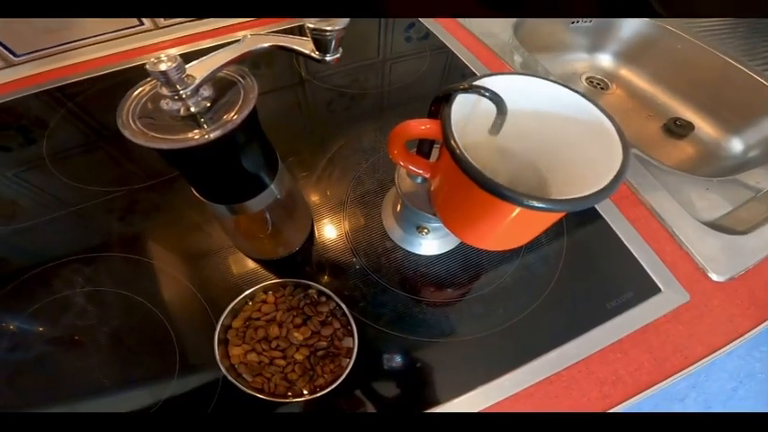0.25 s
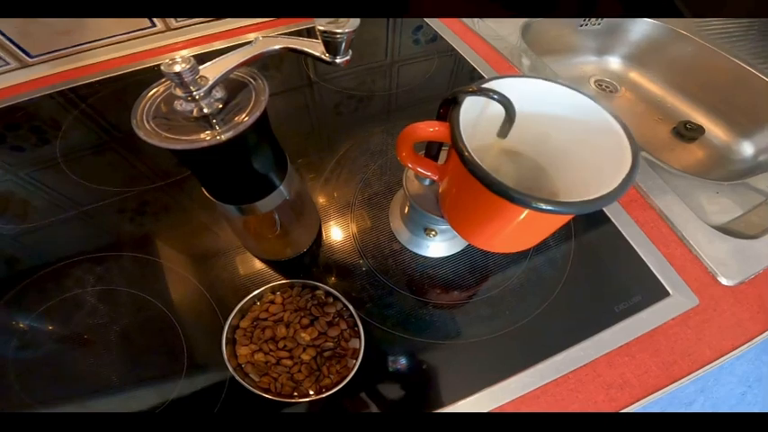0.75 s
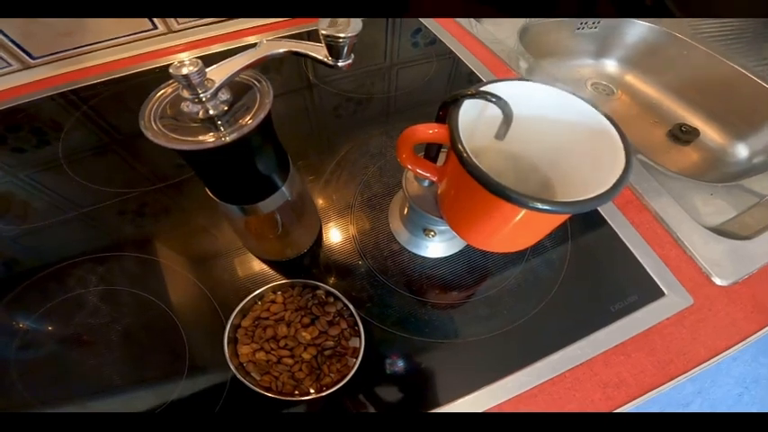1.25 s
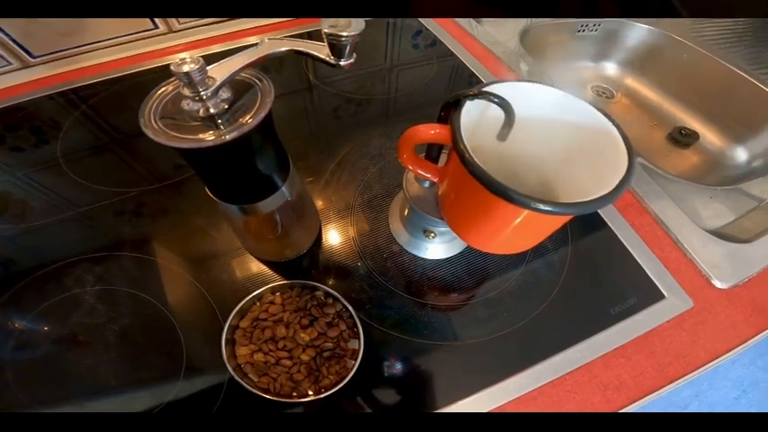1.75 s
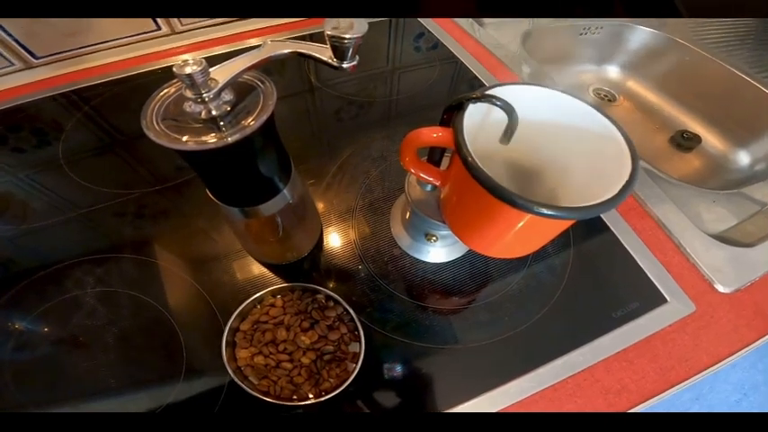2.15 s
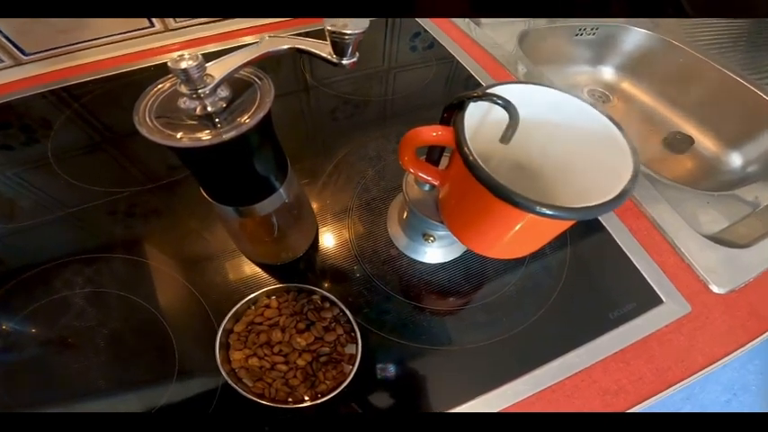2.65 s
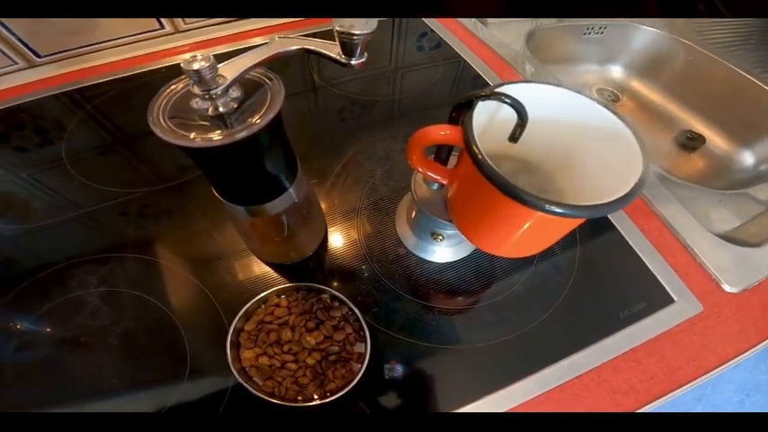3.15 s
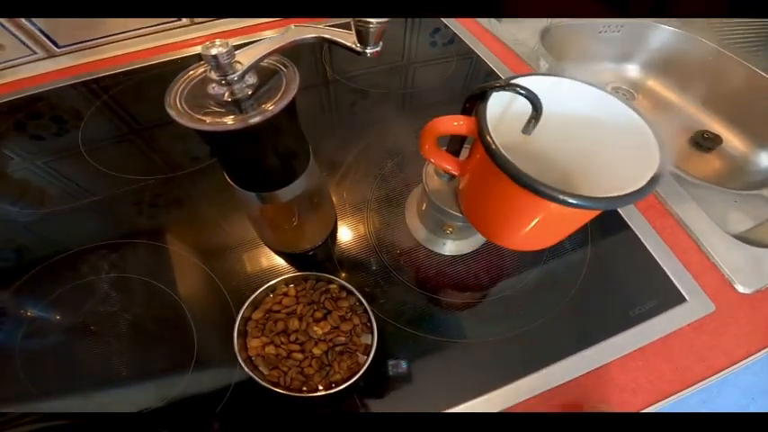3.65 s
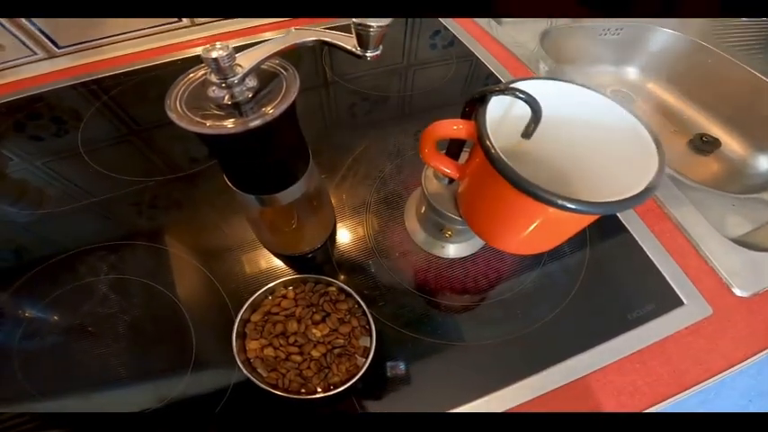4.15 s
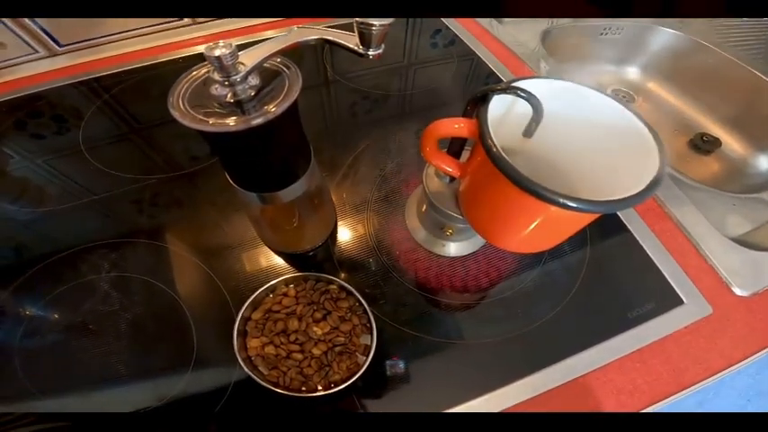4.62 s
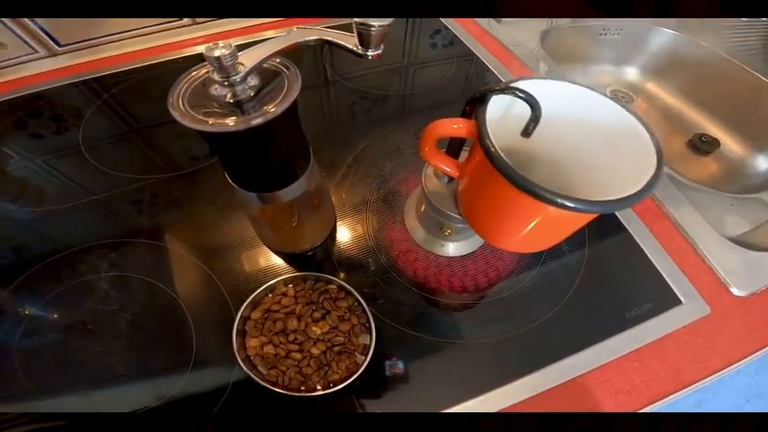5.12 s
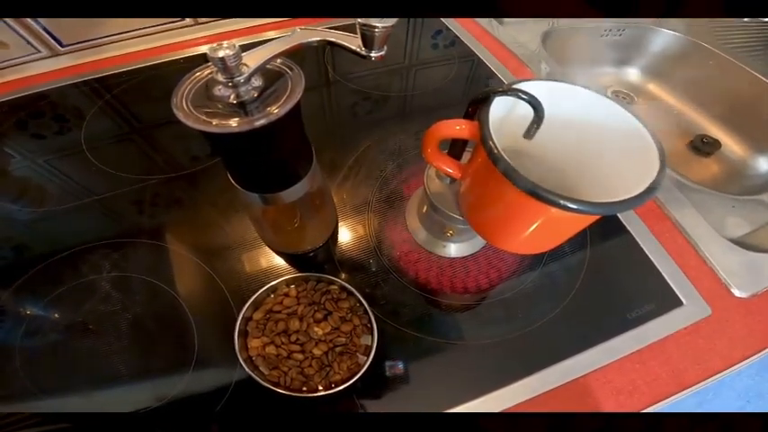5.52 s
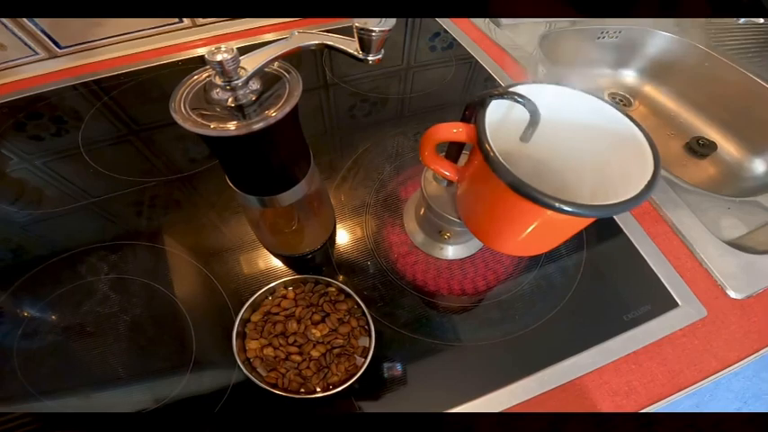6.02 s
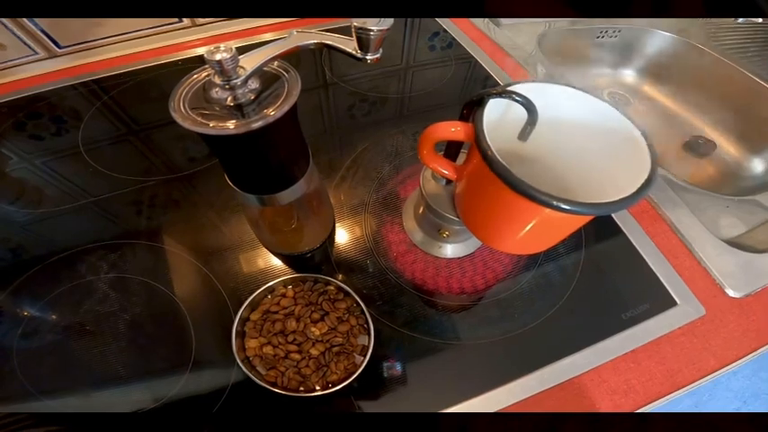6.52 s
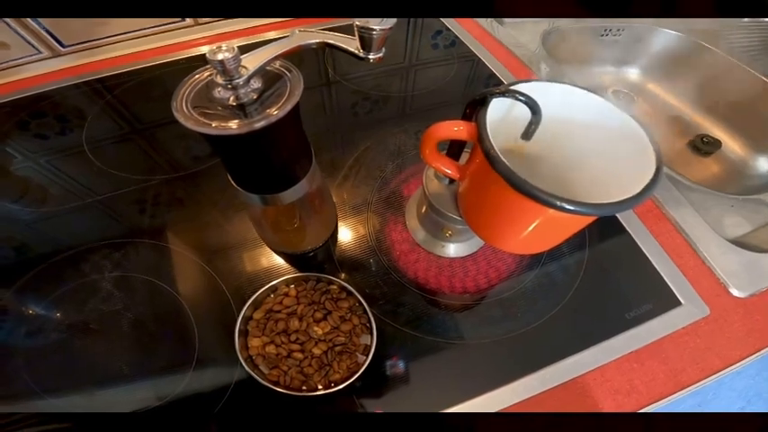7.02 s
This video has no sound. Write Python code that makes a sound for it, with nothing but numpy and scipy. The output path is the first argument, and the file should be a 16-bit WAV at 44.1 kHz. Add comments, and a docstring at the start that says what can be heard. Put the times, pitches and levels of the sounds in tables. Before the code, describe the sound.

Close up in a small kitchen, a stovetop coffee pot starts with single hollow pops over a faint low hob hum. Within a second and a half, steam spurts take over: throaty gurgling, chugging from the base, and wet spray ticking and ringing in an enamel mug. Midway a switch clicks and the hum ends, while the sputtering continues, drier and slightly higher.

```python
"""A stovetop coffee pot spits through its spout into an enamel mug, close by in a small kitchen.
At first the hob hums under single pops: each bursting slug rings the air in the spout (damped oscillation).
Spurts of steam soon take over, with a chugging boiler and fine spray (noise bursts) that rings the mug.
After two seconds steam leaks faintly for a moment (filtered noise); then a switch clicks and the hum stops.
The sputter goes on to the end, its small slugs ringing slightly higher, with duller and weaker spray, as
the spout empties; a steady kitchen background lies under it all."""
import sys
import numpy as np
from scipy import signal
from scipy.fft import rfft, irfft
from scipy.io import wavfile
from scipy.ndimage import uniform_filter1d

SR = 44100
rng = np.random.default_rng(int(sys.argv[2]) if len(sys.argv) > 2 else 0)


def to_wav(sig):
    """Store sig (one row per channel, or 1-D mono) as 16-bit WAV at the path in sys.argv[1].

    Samples outside -1..1 are clipped; the rate is SR.
    """
    pcm = np.clip(np.atleast_2d(sig), -1, 1) * 32767
    pcm = np.round(pcm).astype(np.int16)
    wavfile.write(sys.argv[1], SR, pcm.T)  # frames by channels


N = 321041  # length in samples


def undb(db):
    """Logarithmic level: decibels to amplitude gain."""
    return 10 ** (np.asarray(db) / 20)


def unit(x):
    """Normalisation to an rms value of 1."""
    return x / np.sqrt(np.mean(x ** 2))


def noise():
    """White noise: equal power at all frequencies."""
    return rng.standard_normal(N)


def curves(table):
    """Linear interpolation of each column of a (t/s, ..) table, sample by sample."""
    s, *columns = np.transpose(table)
    return [np.interp(np.arange(N) / SR, s, c) for c in columns]


def add(track, s, sound):
    """Superposition: mix a short sound into the track at time s."""
    i = min(max(int(s * SR), 0), N - 1)
    track[i:i + len(sound)] += sound[:N - i]


def convolve(x, response):
    """Linear filtering: convolution with an impulse response."""
    return signal.fftconvolve(x, response)[:N]


def colour(points, size=4096):
    """Minimum-phase filter: the causal impulse response with a given (f/Hz, level/dB) spectrum."""
    hz, db = np.transpose(points)
    f = np.maximum(np.arange(size // 2 + 1) * SR / size, 1)
    log_gain = np.log(undb(np.interp(np.log(f), np.log(hz), db)))
    # folding the cepstrum onto positive time makes the response causal
    cepstrum = irfft(log_gain)
    cepstrum[1:size // 2] *= 2
    cepstrum[size // 2 + 1:] = 0
    return irfft(np.exp(rfft(cepstrum)))


def resonate(x, modes):
    """Modal resonance: the sound plus the ringing of its (f/Hz, width/Hz, level/dB) modes."""
    out = x
    for hz, width, db in modes:
        out = out + undb(db) * signal.lfilter(*signal.iirpeak(hz, hz / width, SR), x)
    return out


def ring(hz, t60, attack, glide=0, hold=1):
    """Damped oscillation; its pitch slides by the share glide, and hold above 1 keeps the first cycles strong."""
    t = np.arange(int(t60 * SR) + 2) / SR
    shape = (1 - np.exp(-t / attack)) * np.exp(-np.log(1000) * (t / t60) ** hold)
    phase = 2 * np.pi * hz * t * (1 + glide * t / t60 / 2)
    return shape / shape.max() * np.sin(phase)


def burst(t60, size=512):
    """Impulsive noise: a decaying crack with peak 1."""
    x = rng.standard_normal(size) * np.exp(-np.log(1000) * np.arange(size) / SR / t60)
    return x / abs(x).max()


def swell(start, length, attack, release, sag_db=0):
    """Amplitude envelope: a rise, a hold that sags by sag_db, and an exponential release."""
    t = np.arange(int((length + 7 * release) * SR)) / SR
    held = np.minimum(t / attack, 1) * undb(-sag_db * np.minimum(t / length, 1))
    out = np.zeros(N)
    add(out, start, held * np.exp(-np.maximum(t - length, 0) / release))
    return out


def pot(flow, wet, chug_db, empty):
    """Superposition of the pot's sources, driven by one steam flow."""
    small, small_film = bubbling(empty)
    big, big_film = pops(POP_EVENTS + slugs(empty))
    air = big + flow * undb(-3) * small
    # the crack of a film rings the spout too
    struck = air + big_film
    base = boiler(air * undb(chug_db), flow * undb(chug_db), empty)
    tick, splash = drops(flow, empty)
    # films (-1 dB) and mist (-4 dB) follow the wetness of the flow
    droplets = big_film + splash + wet * (undb(-1) * small_film + undb(-4) * mist())
    return spout(struck, empty) + base + spray(droplets, tick, empty) + plinks() + spits()


FILM_T60 = .012  # decay of a bursting film's crack, s
# loud pops that stand out of the gurgle, before the spout colours them:
# columns: t/s, peak level/dB, ring f/Hz, level/dB of the bursting film
POP_EVENTS = [(.1368, -12.5, 1130, -30.5), (0.4282, -5.5, 1070, -21), (.6681, -24, 1070, -26),
              (0.7522, -2, 1030, -21.5), (0.7839, -9.5, 1004, -20), (0.8166, -11.5, 1010, -28),
              (0.8244, -15, 1000, -30), (0.8483, -6.5, 1075, -22.5), (.898, -19, 1050, -33),
              (1.0135, -15, 1008, -46), (1.0522, -20.5, 1020, -41), (1.0954, -15.5, 1025, -39),
              (1.2051, -17.5, 1040, -20.5), (1.2629, -18.5, 960, -30.5), (1.372, -10, 940, -19),
              (1.4293, -8, 780, -37), (1.5411, -12.5, 1005, -21), (1.605, -4.5, 890, -41),
              (1.719, -6, 900, -27), (1.9025, -5.5, 965, -22.5), (2.231, -12, 984, -22),
              (2.3732, -16, 950, -30), (2.5191, -12, 980, -24), (2.5997, -10.5, 900, -26),
              (2.702, -6.5, 1050, -21), (3.0083, -8, 1000, -17), (3.055, -10, 910, -23),
              (3.2277, -7, 930, -25.5), (3.426, -8.5, 950, -24), (3.4412, -13, 930, -24),
              (3.4964, -9, 988, -15), (3.9231, -4, 955, -21), (4.0818, -5.5, 960, -23),
              (4.164, -6.5, 960, -17), (4.2153, -12, 980, -20), (4.293, -13, 1020, -22.5),
              (4.44, -15.5, 925, -43), (4.6692, -7.5, 979, -28), (4.7282, -7.5, 930, -21),
              (4.9208, -15, 1020, -22), (4.9404, -13.5, 1005, -17), (5.1792, -10.5, 990, -22),
              (5.2247, -8.5, 920, -24), (5.268, -8, 1040, -26), (5.3982, -9.5, 1040, -22),
              (5.463, -12.5, 920, -14.5), (5.655, -4.5, 1036, -19.5), (5.833, -10, 940, -34),
              (5.8411, -8, 990, -21.5), (5.9099, -10, 930, -39), (5.994, -6.5, 1030, -39),
              (6.0605, -8, 970, -15.5), (6.067, -3.5, 980, -18), (6.1085, -6, 1010, -27),
              (6.1919, -8.5, 990, -22), (6.3129, -9, 1030, -20), (6.3816, -8.5, 916, -38),
              (6.4164, -16.5, 1030, -12.5), (6.5452, -12, 977, -16.5), (6.598, -11.5, 1020, -21.5),
              (6.6714, -11, 1050, -25.5), (6.707, -10, 904, -24), (6.8328, -13.5, 1040, -19),
              (6.9249, -4, 1000, -39), (6.9379, -4.5, 1054, -21), (7.0733, -11, 1045, -23),
              (7.1533, -2, 960, -53), (7.2726, -5.5, 1038, -25)]


def pops(rows, t60=0.0098, attack=0.0015, film_db=4):
    """Cavity resonance: each pop rings the enclosed air while its bursting film cracks."""
    air, film = np.zeros(N), np.zeros(N)
    for s, db, hz, crack_db in rows:
        add(air, s, undb(db) * ring(hz, t60, attack, hold=1.15))
        add(film, s, undb(crack_db + film_db) * burst(FILM_T60))
    return air, film


PITCH_SPREAD = .11  # random pitch spread, natural log units
REFILL_S, REFILL_DB = 0.011, 19  # slugs this near a loud pop (s) lose up to this much (dB)
# spurts of steam that drive coffee up the spout
# columns: start t/s, length t/s, strength level/dB, extra spray level/dB
STEAM_SPURTS = [(.438, 0.039, -34, -5), (.52, 0.12, -58, 15), (.762, 0.047, -35, -2),
                (1.188, .03, -47.5, 19), (1.34, 0.064, -34, 9.5), (1.422, 0.066, -20.5, -2),
                (1.559, 0.078, -19.5, 1), (1.703, 0.14, -19.5, 1.5), (1.897, 0.12, -26.5, 4.5),
                (2.078, 0.03, -31, 5), (2.18, 0.027, -30, 0), (2.32, .035, -31.5, 6),
                (2.375, 0.1, -26.5, 1.5), (2.517, 0.13, -24.5, -1), (2.695, 0.13, -21.5, -1),
                (2.849, 0.24, -21.5, 0), (3.108, .29, -23, -1), (3.435, 0.035, -25, 0),
                (3.492, 0.22, -23, -1), (3.737, .23, -23, -4.5), (4.059, .13, -20.5, 1.5),
                (4.242, 0.014, -21, 0), (4.311, 0.058, -21.5, 1), (4.437, 0.15, -25.5, 1),
                (4.607, 0.095, -23, -1), (4.727, 0.034, -19.5, 6), (4.783, 0.11, -26.5, 2.5),
                (4.937, 0.16, -24, -3), (5.142, 0.049, -20, 6.5), (5.226, 0.087, -24, 2),
                (5.356, 0.12, -23.5, -3), (5.61, 0.033, -25.5, 6.5), (5.647, 0.051, -18, 1),
                (5.766, .04, -23, -2), (5.834, 0.012, -17.5, 9), (5.891, 0.034, -27.5, -3),
                (5.983, 0.087, -21.5, 3.5), (6.196, .105, -22, 5), (6.343, 0.087, -23, -5),
                (6.477, 0.046, -27, 2), (6.769, 0.13, -25, 3.5), (6.918, 0.041, -20, -2),
                (7.006, 0.0099, -23.5, 8.5), (7.052, 0.092, -19, 1), (7.231, 0.082, -23, 2)]


def slugs(empty, gap_s=.019, uneven=.52, lead_db=9, over_db=6.0, scatter_db=4.5, fade_db_per_s=900,
          hz=915, rise=0.093, film_db=-16, film_scatter_db=4, count=20):
    """Slug flow: a spurt throws one slug at once, then more at uneven gaps until spent; gives pop rows."""
    rows, loud_s = [], np.transpose(POP_EVENTS)[0]
    chances = np.clip(rng.standard_normal((len(STEAM_SPURTS), count, 4)), -1.7, 1.7)
    for (start, length, db, *_), chance in zip(STEAM_SPURTS, chances):
        s = start
        for gap, big, pitch, sharp in chance:
            spent_db = fade_db_per_s * max(s - start - length, 0)
            refill_db = REFILL_DB * max(1 - np.abs(s - loud_s).min() / REFILL_S, 0)
            above_db = lead_db if s == start else over_db + scatter_db * big
            peak = db + above_db - spent_db - refill_db
            ring_hz = hz * np.exp(rise * empty[min(int(s * SR), N - 1)] + PITCH_SPREAD * pitch / 2)
            rows.append((s, peak, ring_hz, peak + film_db + film_scatter_db * sharp))
            s += gap_s * np.exp(uneven * gap)
    return rows


# every spurt opens fast (s), sags as its pressure is spent (dB), dies away (time constant, s)
ATTACK_S, SAG_DB, RELEASE_S = 0.0033, 2.5, 0.0061
# bubbling between the spurts: level at 0 dB of chugging (dB), dB per dB of chugging
SIMMER_DB, SIMMER_SLOPE = -37.5, 0.28
# spray in a spurt of 0 dB (dB), dB of spray per dB of flow, the fizz that never stops (dB)
SPRAY_DB, SPRAY_SLOPE, FIZZ_DB = -22.5, 0.94, -57.5


def steam_flow(chug_db):
    """Source modulation: spurts over a growing simmer set the gains of flow and of the spray it carries."""
    flow, wet = undb(SIMMER_DB + SIMMER_SLOPE * chug_db), undb(FIZZ_DB)
    for s, length, db, spray_db in STEAM_SPURTS:
        shape = swell(s, length, ATTACK_S, RELEASE_S, SAG_DB)
        flow = flow + undb(db) * shape
        wet = wet + undb(SPRAY_DB + SPRAY_SLOPE * db + spray_db) * shape
    return flow, wet


def bubbling(empty, rate=170, scatter_db=3.5, hz=945, rise=0.038, t60=0.0093, attack=0.00091,
             film_scatter_db=3, count=2400):
    """Random pulse train: small slugs leave unevenly and ring a little higher as the spout empties."""
    air, film = np.zeros(N), np.zeros(N)
    chance = rng.standard_normal((count, 4))
    # rate is one over the median gap
    times = np.cumsum(np.exp(.45 * chance[:, 0])) / rate
    for s, (_, big, pitch, sharp) in zip(times, chance):
        if s < N / SR:
            gain = undb(scatter_db * np.minimum(big, 1))
            ring_hz = hz * np.exp(PITCH_SPREAD * pitch + rise * empty[int(s * SR)])
            add(air, s, gain * ring(ring_hz, t60, attack, hold=1.39))
            add(film, s, gain * undb(film_scatter_db * sharp) * burst(FILM_T60))
    return unit(air), unit(film)


# colour of a pop with the spout full of coffee; columns: f/Hz, level/dB
SPOUT_FULL = [(200, -24), (550, -17.5), (690, -8.5), (800, -0.5), (930, 5), (1080, -11), (1370, -3),
              (1500, -19), (1900, -20), (2500, 16), (5000, -21.5), (12000, -51)]
# colour of a pop with the spout emptied; columns: f/Hz, level/dB
SPOUT_EMPTY = [(200, -26.5), (550, -16.5), (680, -10.5), (790, -1), (900, 0), (1010, 1), (1130, -3.5),
               (1450, 4), (1650, 0), (1900, -14.5), (2400, -16), (5000, -28.5), (12000, -44)]


def spout(struck, empty):
    """Duct resonance: the response crossfades from the full to the emptied spout."""
    full_sound = convolve(struck, colour(SPOUT_FULL))
    empty_sound = convolve(struck, colour(SPOUT_EMPTY))
    return (1 - empty) * full_sound + empty * empty_sound


# colour of the boiler below; columns: f/Hz, level/dB
BOILER_COLOUR = [(25, -2), (70, 18), (130, 11), (200, 13), (400, 13.5), (550, 6.5), (630, -5), (700, -8.5),
                 (1200, -49.5), (4000, -66)]


def boiler(chugging, drive, empty):
    """Coupled cavities: once steam fills the riser, every pop also shakes the boiler."""
    shaken = undb(-1.5) * convolve(chugging, colour(BOILER_COLOUR))
    return shaken + rumble(chugging, empty) + gurgle(drive) + knocks()


# rumble of the boiling base; columns: f/Hz, level/dB
RUMBLE_COLOUR = [(25, -6), (60, 0), (98, 2.5), (130, 1), (200, 4), (265, 1), (330, -18), (600, -27.5),
                 (3000, -100)]
# long resonances of the pot on the hob top, before damping; columns: f/Hz, width/Hz, level/dB
BOOM_MODES = [(100, 12, 12), (240, 11, 14.5)]


def rumble(chugging, empty, rumble_db=-19, damping_db=6, follow_s=0.029, follow=.75):
    """Compressive excitation: the base yields less to the hardest spurts and booms more as its water runs out."""
    power = np.abs(uniform_filter1d(chugging ** 2, max(int(follow_s * SR), 1)))
    force = np.sqrt(power.mean() * (power / power.mean()) ** follow)
    drive = force * undb(rumble_db) * unit(convolve(noise(), colour(RUMBLE_COLOUR)))
    boom = resonate(drive, BOOM_MODES) - drive
    return drive + undb(-damping_db * (1.5 - empty)) * boom


def gurgle(drive, low_hz=170, high_hz=620, cycles=14, attack=0.0035, glide=0.067, bubble_db=-13,
           scatter_db=4, count=420):
    """Bubble resonance: big bubbles in the boiler each ring at their own low pitch, gliding up."""
    out = np.zeros(N)
    for where, size, big in rng.random((count, 3)):
        hz = low_hz * (high_hz / low_hz) ** size
        gain = drive[int(where * N)] * undb(bubble_db + scatter_db * (2 * big - 0.5))
        add(out, where * N / SR, gain * ring(hz, cycles / hz, attack, glide))
    return out


# dull knocks of boiling water in the base; columns: t/s, peak level/dB, f/Hz
BASE_KNOCKS = [(.753, -34, 58), (0.785, -31, 104), (0.799, -33, 172), (.83, -37, 50), (1.447, -32, 105),
               (2.103, -30, 64.4), (2.15, -33.5, 154), (5.835, -17.5, 236.7)]


def knocks(t60=.12, attack=0.0037):
    """Bubble collapse: large steam bubbles collapse in the base with a soft thud."""
    out = np.zeros(N)
    for s, db, hz in BASE_KNOCKS:
        add(out, s, undb(db) * ring(hz, t60, attack))
    return out


DRYING_DB = 3  # spray lost once the spout is empty
# colour of the spray with the spout full; columns: f/Hz, relative level/dB
FULL_SPRAY = [(1060, -40), (1800, -4), (2060, -8), (2480, 7), (4010, -5), (4890, -9.5), (5550, -3.5),
              (6100, -12.5), (6830, -10), (7400, -12.5), (8710, -18), (10200, -18), (11100, -23.5),
              (12500, -19), (14500, -38), (15500, -41)]
# colour of the spray with the spout emptied; columns: f/Hz, relative level/dB
EMPTY_SPRAY = [(1060, -17.5), (1800, -7), (2020, -11), (2300, -16.5), (2980, 4.5), (4240, -3.5), (4810, -7),
               (5260, -19), (5970, -3.5), (6410, -21.5), (6830, -13), (8320, -27), (11400, -28.5),
               (13500, -38), (15500, -68)]
# modes of the mug; columns: f/Hz, width/Hz, level/dB
MUG_MODES = [(2956, 18.3, 2), (3470, 38, -9), (4740, 50, 2), (6030, 88, -9), (6610, 110, 2), (9940, 120, 3)]


def spray(droplets, tick, empty):
    """Modal excitation: coloured spray noise and ticking drops set the mug ringing."""
    full_response, empty_response = colour(FULL_SPRAY), colour(EMPTY_SPRAY)
    # both responses are scaled to equal energy
    early = convolve(droplets, full_response / np.linalg.norm(full_response))
    late = convolve(droplets, empty_response / np.linalg.norm(empty_response))
    mug = resonate((1 - empty) * early + empty * late + tick, MUG_MODES)
    return undb(-DRYING_DB * empty) * mug


def mist(scatter_db=8.0, t60=0.0032, count=4500):
    """Shot noise: countless tiny droplets, a few much larger than the rest."""
    out = np.zeros(N)
    for where, chance in rng.random((count, 2)):
        add(out, where * N / SR, undb(-scatter_db * np.log(chance + 0.041)) * burst(t60))
    return unit(out)


# the largest spray drops that hit the mug, before its colouring; columns: t/s, level/dB
LARGE_DROPS = [(.2041, -28.5), (0.258, -26), (.316, -30), (0.3367, -28), (.3587, -27.5), (.4153, -22.5),
               (.701, -29), (.913, -27), (1.1185, -28), (1.974, -15), (2.2098, -18), (2.387, -21),
               (2.725, -15.5), (2.784, -11.5), (2.843, -14.5), (3.856, -17), (4.8705, -14), (5.0325, -16),
               (6.9444, -14)]


def drops(flow, empty, hz=2650, rise=0.35, t60=0.0025, attack=.0001, ring_db=-6, splash_db=-2,
          stray_db=-17, follow=0.37, scatter_db=3, count=110):
    """Impact sound: drops tick and splash in the mug; stray ones fall all the time, harder in strong flow."""
    tick, splash = np.zeros(N), np.zeros(N)
    times = (np.arange(count) + rng.random(count)) / count * (N - 1) / SR
    stray = []
    for s, big in zip(times, rng.uniform(-0.8, 2.5, count)):
        flow_db = 20 * np.log10(flow[int(s * SR)])
        stray.append((s, stray_db + follow * flow_db + scatter_db * big))
    for s, db in LARGE_DROPS + stray:
        pitch = hz * np.exp(rise * empty[int(s * SR)] + PITCH_SPREAD * rng.standard_normal())
        add(tick, s, undb(db + ring_db) * ring(pitch, t60, attack))
        add(splash, s, undb(db + splash_db) * burst(FILM_T60))
    return tick, splash


# bubbles that ring in the pooled coffee; columns: t/s, peak level/dB, f/Hz, t60/s
POOL_BUBBLES = [(1.581, -21, 5540, 0.012), (1.784, -18, 2660, 0.012), (2.231, -15, 1232, 0.048),
                (2.234, -26, 2500, 0.034), (2.343, -13, 2850, 0.0072), (2.343, -26, 3580, 0.019),
                (2.958, -20.5, 2550, 0.016), (5.448, -27, 2175, 0.065), (5.45, -29, 4100, 0.031)]


def plinks():
    """Bubble resonance: trapped bubbles ring and rise a little in pitch."""
    out = np.zeros(N)
    for s, db, hz, t60 in POOL_BUBBLES:
        add(out, s, undb(db) * ring(hz, t60, attack=.0002, glide=.02))
    return out


# sharp spits of steam through a thin film, before the band-pass; columns: t/s, peak level/dB
STEAM_SPITS = [(0.523, -34), (1.472, -27), (2.386, -25.5), (2.712, -19.5), (6.418, -31), (7.112, -22)]


def spits(low_hz=6000, high_hz=11000):
    """Band-limited noise: brief, very bright hisses."""
    out = np.zeros(N)
    for s, db in STEAM_SPITS:
        add(out, s, undb(db) * burst(2 * FILM_T60))
    return signal.sosfilt(signal.butter(3, [low_hz, high_hz], "band", fs=SR, output="sos"), out)


# nearby hard surfaces, before the treble loss; columns: delay t/s, signed gain
SURFACE_ECHOES = [(.0095, -0.066), (0.0168, .05), (0.0258, -.075), (.0315, .07), (.0413, 0.089)]


def room(x, wet_db=-12, build=0.0081, dull_hz=6000, t60=.24):
    """Reflection and reverberation: echoes from worktop and walls within a short diffuse tail."""
    t = np.arange(SR // 2) / SR
    tail = rng.standard_normal(len(t)) * (1 - np.exp(-t / build)) * np.exp(-np.log(1000) * t / t60)
    response = undb(wet_db) * tail / np.linalg.norm(tail)
    for delay, gain in SURFACE_ECHOES:
        response[int(delay * SR)] += gain
    return x + convolve(x, signal.lfilter(*signal.butter(1, dull_hz, fs=SR), response))


# colour of the leak; columns: f/Hz, relative level/dB
LEAK_SPECTRUM = [(2000, -10), (4000, 4), (5600, 8), (8000, -14), (11300, -8), (12150, 0), (13200, -10),
                 (14500, -5), (15800, -19)]


def steam_leak(flow, leak_db=-56, slope=0.22):
    """Jet noise: a thin hiss swells and fades, following the flow by slope dB per dB."""
    level = undb(leak_db) * swell(start=2.22, length=.97, attack=0.29, release=0.22)
    level = level * (flow / np.median(flow)) ** slope
    return level * unit(convolve(noise(), colour(LEAK_SPECTRUM)))


SWITCH_S = 3.4452  # the hob's switch clicks
# hum of the hob; columns: f/Hz, rms level/dB
HOB_HUM = [(100.5, -58), (149, -48.5)]


def hob_hum(stop_s=.03):
    """Tonal sound: steady sinusoids that die within stop_s after the click."""
    t = np.arange(N) / SR
    hum = np.zeros(N)
    for hz, db in HOB_HUM:
        hum += undb(db) * np.sqrt(2) * np.sin(2 * np.pi * (hz * t + rng.random()))
    return hum * np.clip((SWITCH_S - t) / stop_s + 1, 0, 1)


def switch_click(peak_db=-24):
    """Impulsive sound: one dry click of the hob's switch."""
    out = np.zeros(N)
    add(out, SWITCH_S, undb(peak_db) * burst(t60=.001))
    return out


# kitchen background; columns: f/Hz, relative level/dB
KITCHEN_COLOUR = [(25, -4.5), (90, -10.5), (150, -7), (200, -0.5), (280, -1), (350, -8), (650, -11),
                  (1000, -5.5), (2000, -22), (3000, -20), (6000, -29.5), (12000, -39.5), (15500, -62)]


def kitchen(level_db=-45):
    """Stationary noise: a steady coloured background."""
    return undb(level_db) * unit(convolve(noise(), colour(KITCHEN_COLOUR)))


# how much steam has broken through the coffee
# columns: t/s, boiler chugging level/dB, emptiness of the spout (0-1)
STEAM_COURSE = [(0, -28, 0.14), (1.3, -13, .36), (1.43, -3.5, .28), (2.3, 0.5, 0.48), (2.9, 1, 0.38),
                (3.7, 2, 0.81), (5.5, 2, 0.93), (7.28, 1.5, 0.82)]


def scene():
    """Superposition: the pot in the room, the dry leak and hob, and the kitchen."""
    chug_db, empty = curves(STEAM_COURSE)
    flow, wet = steam_flow(chug_db)
    hob = steam_leak(flow) + hob_hum() + switch_click()
    return (room(pot(flow, wet, chug_db, empty)) + hob + kitchen())[None]


def record(dry, top_hz=15400):
    """Band limitation: a steep elliptic low-pass cuts the top."""
    return signal.sosfilt(signal.ellip(8, .2, 70, top_hz, fs=SR, output="sos"), dry)


dry = scene()
out = record(dry)
to_wav(out)
```